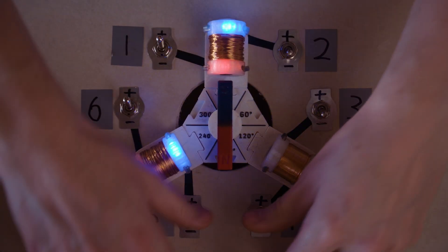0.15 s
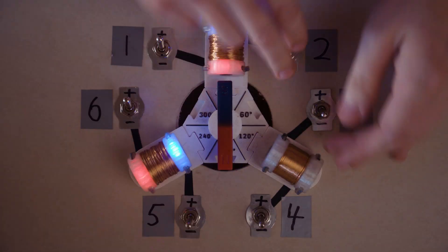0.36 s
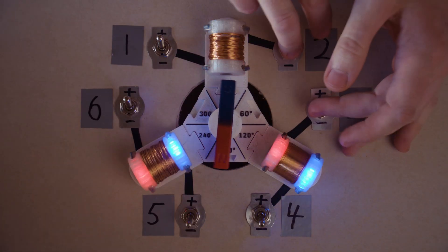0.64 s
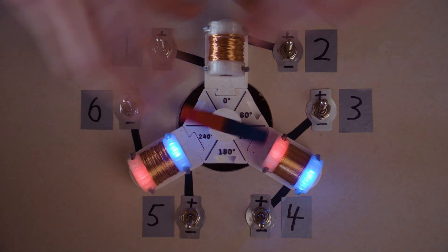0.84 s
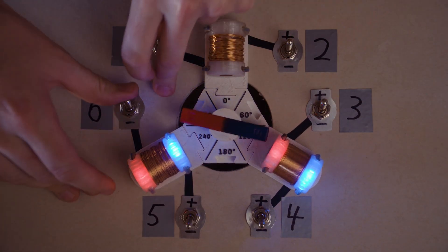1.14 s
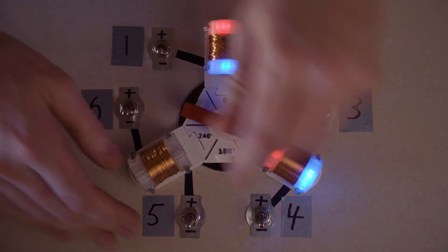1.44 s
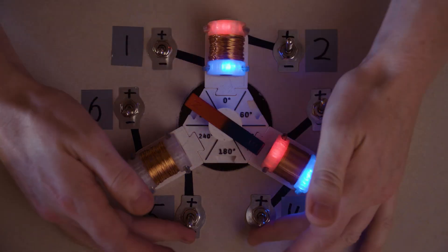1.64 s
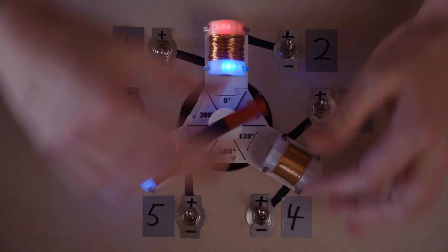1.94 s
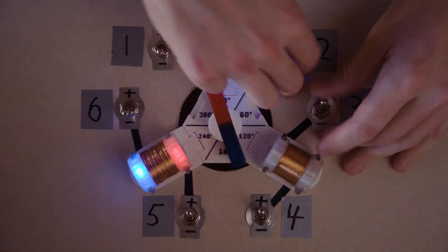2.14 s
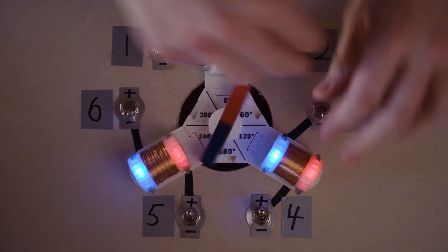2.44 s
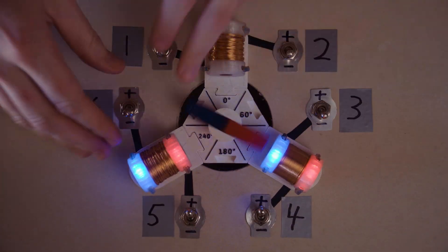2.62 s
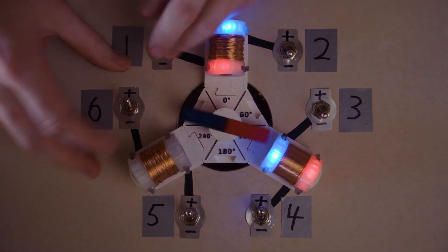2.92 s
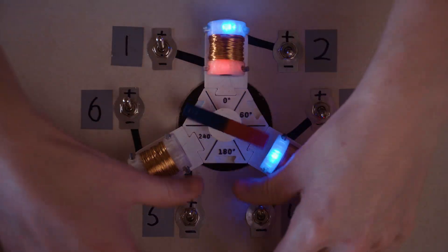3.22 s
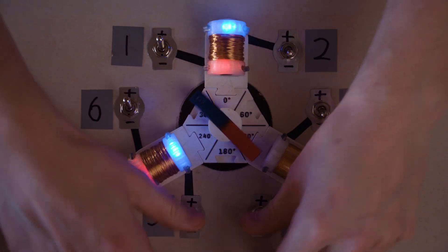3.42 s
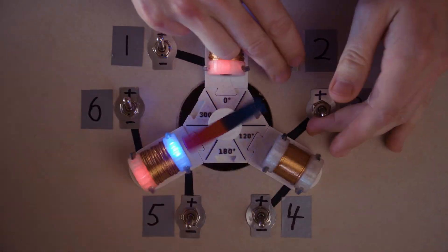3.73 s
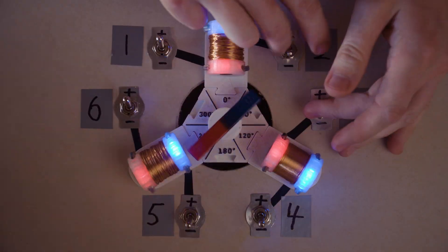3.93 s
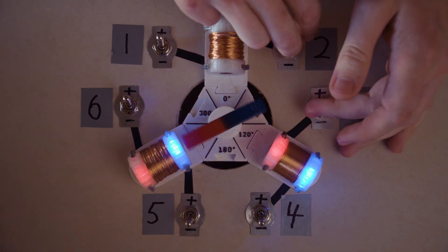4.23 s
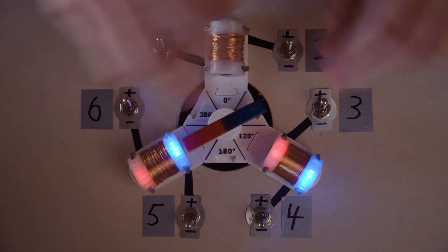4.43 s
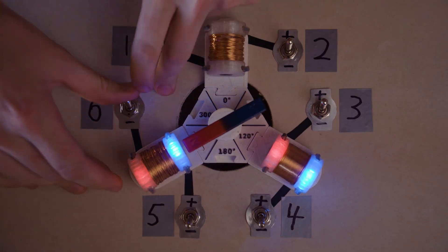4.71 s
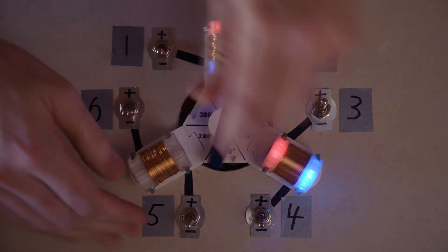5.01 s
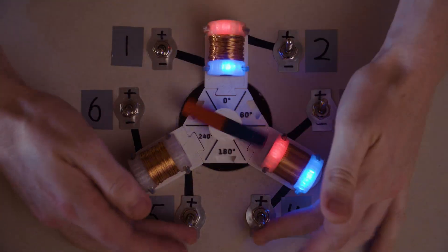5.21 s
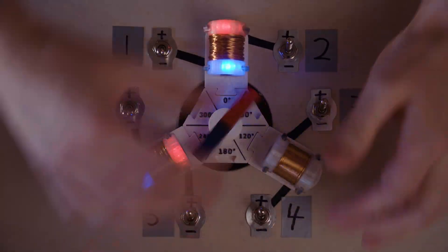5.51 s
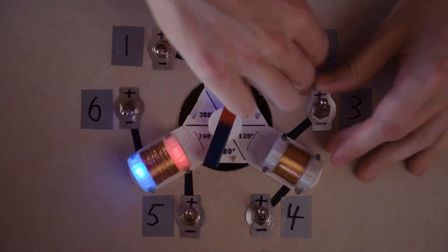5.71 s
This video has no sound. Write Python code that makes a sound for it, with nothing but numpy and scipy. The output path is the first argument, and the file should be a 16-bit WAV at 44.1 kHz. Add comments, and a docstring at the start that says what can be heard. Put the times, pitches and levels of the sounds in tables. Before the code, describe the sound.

Crisp, bright clusters of lever switch clicks at a steady pace, each with a tiny rattle and short room echo over faint low hum.

```python
"""Metal toggle switches in a thin board snap over in quick groups, each with a short ringing rattle;
between them fingers tick and brush, over a low room hum and faint far chirps in a small quiet room.
Snaps are shaped noise plus struck modes of lever, housing and board; touches and brushing are noise
grains, touches with a board thud; chirps are warbling sines; the room is decaying noise tails and the
hum is coloured noise with a drone."""
import sys
import numpy as np
from scipy import signal
from scipy.fft import rfft, irfft
from scipy.io import wavfile
from scipy.ndimage import uniform_filter1d

SR = 44100
rng = np.random.default_rng(int(sys.argv[2]) if len(sys.argv) > 2 else 0)


def pcm_store(signal):
    """Save signal as 16-bit PCM."""
    levels = np.round(np.clip(np.atleast_2d(signal), -1, 1) * 32767)
    wavfile.write(sys.argv[1], SR, levels.astype(np.int16).T)


def makeup_ratio(level_db):
    """Linear amplitude ratio for a level in decibels (20 dB per factor of ten)."""
    decades = np.asarray(level_db, float) / 20
    return 10 ** decades


N = 258426
LEAD_S = 0.016  # spring loading time ahead of the snap

# colour of skin or nail on metal: f/Hz, relative density/dB
BRUSH_COLOUR = [(880, -37), (1500, 1.5), (2830, -17.5), (3410, -4), (8490, -7), (13000, -17), (16000, -32)]


def snap(snap_db, lever_hz, housing_db, board_db, place_hz):
    """The spring scrapes as it loads, then the lever hits its stop and chatters for a few ms."""
    # rattle colour: f/Hz, relative density/dB
    crack_colour = [(880, -24), (1500, -10), (4690, -9), (5440, -7), (6890, -10.5), (7460, -10),
                    (9850, -13.5), (14300, -25.5), (16000, -41)]
    # housing modes: f/Hz, relative level/dB, t60/s
    housing_modes = [(1390, -3, 0.015), (1604, -2.5, 0.038), (1790, -2.5, .02), (2150, -9, 0.018)]
    t = np.arange(4096) / SR - LEAD_S
    scrape = 0.01 * np.exp(t / 0.017) + 0.27 * np.exp(t / 0.0004)
    onset = np.clip(0.6 + t / 0.00062, 0, 1)
    hit = onset * np.exp(-t / 0.0036) + 0.28 * np.exp(-t / 0.025)
    chatter = np.where(t < 0, scrape, hit)

    # stiffer lever, brighter crack
    tilt_db = 3 * np.log2(lever_hz / 6000)
    colour = [(hz, db + tilt_db * np.log2(hz / 6000)) for hz, db in crack_colour]
    rattle = noise(colour, size=len(t))
    dull = uniform_filter1d(rattle, size=3)
    treble_decay = np.exp(-np.maximum(t, 0) / 0.0077)  # treble leaves the small parts first
    crack = evened((dull + (rattle - dull) * treble_decay) * chatter) / 15

    push = rng.standard_normal(len(t)) * chatter ** 2
    # main bending mode and a weaker second one
    lever = ring(push, [(lever_hz, 0, 0.012), (lever_hz * 1.3, -8, 0.01)], spread_db=3)
    housing = ring(push, housing_modes, spread_db=1)
    thump = board(push + 3 * (t > 0) * np.exp(-abs(t) / 0.00017), place_hz)
    return (makeup_ratio(snap_db - 0.5) * (crack + makeup_ratio(-7.5) * lever)
            + makeup_ratio(housing_db + 5) * housing + makeup_ratio(board_db - 0.5) * thump)


def touch(tick_db, thud_db, place_hz):
    """A nail tick on metal and a soft push into the board."""
    t = np.arange(4096) / SR
    tick = noise(BRUSH_COLOUR, size=len(t)) * np.exp(-t / 0.0065) * np.clip(t / 0.0021, 0, 1) / 2
    soft_push = t * np.exp(-t / 0.0006)  # a soft fingertip stirs mostly the low modes
    return makeup_ratio(tick_db) * tick + makeup_ratio(thud_db) * board(soft_push, place_hz)


def brush(length_s, level_db):
    """Sliding skin or sleeve: noise with a random grainy level."""
    size = round(length_s * SR)
    grain = makeup_ratio(2.5 * evened(uniform_filter1d(rng.standard_normal(SR // 2), 120)))
    slide = noise(BRUSH_COLOUR, size=SR // 2) * grain
    return makeup_ratio(level_db) * slide[:size] * signal.windows.tukey(size, 0.6)


def board(push, place_hz):
    """Each place on the board lies near the belly of some modes and the nodes of others."""
    # board modes: f/Hz, relative level/dB, t60/s
    board_modes = [(209, -6.5, 0.21), (326, -13.5, 0.041), (410, -1, 0.11), (621, -2, 0.14),
                   (724, 3.5, 0.096), (820, -2, 0.062), (970, -1, 0.056), (1040, 0.5, 0.14)]
    modes = [(hz, db - np.minimum(30 * abs(np.log2(hz / place_hz)), 11), t60)
             for hz, db, t60 in board_modes]
    return ring(push, modes, spread_db=2)


def ring(push, modes, spread_db):
    """A push excites decaying modes with random level and pitch offsets; rms 0.1."""
    t = np.arange(len(push)) / SR
    body = np.zeros(len(push))
    for hz, db, t60 in modes:
        level_luck, pitch_luck = rng.standard_normal(2)
        decay = makeup_ratio(db + spread_db * level_luck - 60 * t / t60)
        body += decay * np.sin(2 * np.pi * hz * (1 + 0.017 * pitch_luck) * t)
    return evened(signal.fftconvolve(push, body)[:len(push)]) / 10


def hands():
    """Snaps, touches and brushing heard directly, and the part of the snaps that reaches the walls."""
    # lever snaps: pair, t/s, snap level/dB, lever f/Hz, housing level/dB, board level/dB (relative)
    snaps = [("front", 0.1691, -10.5, 5577, -28, -16.5), ("front", 0.1798, 0, 6770, -14, -8.5),
             ("front", 0.2063, -5, 7360, -15.5, -16), ("right", 0.7292, -0.5, 6150, -15.5, -22.5),
             ("right", 0.7475, -2.5, 5490, -14, -13.5), ("left", 1.3261, 0.5, 6060, -13, -19.5),
             ("left", 1.3423, -3.5, 4750, -21.5, -17.5), ("front", 1.8468, -6, 6320, -22.5, -17),
             ("front", 1.8571, -4.5, 5604, -13.5, -25), ("front", 1.8783, 0.5, 5886, -9.5, -25),
             ("right", 2.4019, 0, 7930, -22.5, -16.5), ("right", 2.4298, -2.5, 5776, -15.5, -12),
             ("left", 2.9372, -2, 7380, -11, -24), ("left", 2.9407, 1, 5506, -34, -13),
             ("left", 2.9478, -13.5, 6330, -28.5, -13), ("front", 3.446, -5.5, 5630, -28, -30),
             ("front", 3.4555, 0, 6660, -14.5, -12.5), ("front", 3.4685, -5, 6344, -14.5, -15),
             ("right", 3.9446, -1.5, 5983, -13.5, -13), ("right", 4.33, 0.5, 5600, -10.5, -15.5),
             ("left", 4.9295, 0.5, 7545, -16, -11.5), ("left", 4.9467, -4, 4703, -18, -30),
             ("front", 5.4369, -7, 6166, -22.5, -20), ("front", 5.4425, -3, 5645, -14.5, -13.5),
             ("front", 5.4652, 0.5, 5245, -10.5, -22.5)]
    # board region favoured by each switch pair: pair -> f/Hz
    pair_places = {"front": 620, "right": 980, "left": 650}
    # fingertip landings: t/s, relative tick level/dB, relative thud level/dB
    touches = [(0.0209, -44.5, -33), (0.1194, -49.5, -56), (0.5487, -42, -50), (0.6694, -55, -54.5),
               (1.1792, -49, -48), (1.2635, -43, -60), (1.697, -47, -53), (2.1655, -44, -29),
               (2.5894, -53, -32.5), (2.6294, -48, -32), (2.7494, -53.5, -41), (2.9068, -45.5, -35.5),
               (3.0494, -35.5, -27), (3.8556, -42, -50.5), (4.774, -45, -52), (4.8673, -45.5, -56.5),
               (5.3063, -47, -49)]
    # sliding skin and sleeves: start t/s, length/s, level/dB
    brushes = [(.01, 0.066, -69), (0.411, 0.23, -62.5), (0.526, 0.033, -56), (1.687, 0.11, -64),
               (1.973, 0.052, -54.5), (2.149, 0.073, -65), (2.24, .04, -66), (2.752, .07, -65.5),
               (3.416, 0.069, -49.5), (3.756, .14, -64.5), (3.918, 0.027, -53), (5.292, .11, -62),
               (5.57, 0.035, -50.5), (5.761, 0.094, -70)]
    mix, walls = np.zeros(N), np.zeros(N)
    for pair, s, *blow in snaps:
        sound = snap(*blow, pair_places[pair])
        add(mix, s - LEAD_S, sound)
        add(walls, s - 256 / SR, scattered(sound))  # click is centred on sample 256
    for s, *blow in touches:
        add(mix, s, touch(*blow, place_hz=400))
    for s, length_s, db in brushes:
        add(mix, s, brush(length_s, db))
    return mix, walls


def scattered(sound):
    """What the walls receive: a click with the sound's colour averaged over all directions."""
    power = abs(rfft(sound)) ** 2
    fine = uniform_filter1d(power, 25)
    coarse = uniform_filter1d(uniform_filter1d(power, 130), 130)
    # short waves are mixed more thoroughly
    treble = np.clip(np.fft.rfftfreq(len(sound), 1 / SR) / 2500, 0, 1)
    click = irfft(np.sqrt(abs(fine + treble * (coarse - fine))))
    return np.roll(click, 256)[:512] * np.hanning(512)


def room(x):
    """Dense echoes as noise, each band dying at its own speed; three tails take turns cyclically."""
    # initial tail colour: f/Hz, relative level/dB
    tail_colour = [(150, -6.5), (500, 1), (2000, 2), (6000, -1.5), (11000, -3), (15500, 3.5)]
    # reverberation time: f/Hz, t60/s
    tail_t60 = [(200, .35), (530, 0.4), (1400, 0.36), (3700, 0.36), (8000, 0.29), (12000, 0.28),
                (15500, 0.41)]
    hz, t, z = signal.stft(rng.standard_normal((3, SR // 2)), SR, nperseg=256)
    decay_db = read(tail_colour, hz)[:, None] - 60 * t / read(tail_t60, hz)[:, None]
    tails = signal.istft(z * makeup_ratio(decay_db), SR, nperseg=256)[1]
    tails = tails * np.clip(np.arange(tails.shape[1]) / SR / 0.0034, 0, 1)
    tails = tails / np.linalg.norm(tails[0])
    # 0.6 turns/s, tails a third of a turn apart
    turn = np.arange(N) / SR * 2 * np.pi * 0.6 + np.arange(3)[:, None] * 2 * np.pi / 3
    feeds = x * np.cos(turn) * np.sqrt(2 / 3)
    return signal.fftconvolve(feeds, tails, axes=1)[:, :N].sum(0)


def chirps():
    """Thin whistles: sines whose pitch warbles at random under a smooth swell."""
    # far chirps: start t/s, length/s, centre f/Hz, relative level/dB
    chirp_list = [(3.142, 0.052, 5430, -61), (3.17, 0.079, 5000, -67), (3.29, .09, 4720, -66),
                  (3.369, 0.064, 5770, -56.5), (3.6, 0.09, 5400, -67), (3.725, 0.053, 4700, -65),
                  (3.77, .13, 5480, -61), (4.136, .07, 4570, -64), (4.235, 0.08, 5280, -61),
                  (4.48, 0.056, 5060, -63)]
    mix = np.zeros(N)
    warble = 0.035  # fraction of the pitch
    for s, length_s, hz, db in chirp_list:
        size = round(length_s * SR)
        wobble = evened(uniform_filter1d(rng.standard_normal(SR // 2), 150))[:size]
        wobble = wobble - wobble.mean()
        phase = 2 * np.pi * np.cumsum(hz * (1 + warble * wobble)) / SR
        add(mix, s, makeup_ratio(db) * np.sin(phase) * np.hanning(size))
    return mix


def hum():
    """Steady hiss, a wavering low boom, a thin deep drone and a trace of sub-bass."""
    # hiss colour: f/Hz, relative density/dB
    hiss_colour = [(290, -30.5), (500, -3.5), (1380, -9.5), (1950, -19), (3200, -15.5), (5020, -23.5),
                   (10700, -24), (16000, -39)]
    # low room resonances: f/Hz, relative density/dB
    boom_colour = [(110, -31), (135, -7), (165, -3.5), (205, -10), (265, 0), (330, -8), (500, -19),
                   (800, -22), (1200, -47)]
    # boom level: t/s, level/dB
    boom_curve = [(0.0, -54), (0.7, -57), (2.32, -52), (3.26, -58), (3.69, -54), (5.86, -59)]
    # drone that comes and goes: t/s, relative level/dB
    drone_curve = [(0.0, -57), (0.05, -46), (0.18, -67), (2.37, -67), (2.5, -57), (3.33, -72), (3.39, -57),
                   (4.28, -77), (4.34, -60), (5.14, -71), (5.5, -55), (5.86, -77)]
    # sub-bass colour: f/Hz, relative density/dB
    deep_colour = [(15, -21.5), (30, -6), (75, -2.5), (110, -2.5), (140, -30.5), (300, -92)]
    drift = evened(uniform_filter1d(uniform_filter1d(rng.standard_normal(N), 3000), 3000))
    # pitch and level waver
    drone = np.sqrt(2) * np.sin(2 * np.pi * np.cumsum(75 + 4 * drift) / SR)
    drone = drone * makeup_ratio(4 * np.roll(drift, SR) - 3)
    hiss = makeup_ratio(-64) * noise(hiss_colour, size=N)
    boom = level(boom_curve) * noise(boom_colour, size=N)
    deep = makeup_ratio(-66.5) * noise(deep_colour, size=N)
    return hiss + boom + level(drone_curve) * drone + deep


def evened(x):
    """Scales to rms 1."""
    return x / np.sqrt(np.mean(x ** 2) + 1e-20)


def read(points, hz):
    """Interpolates a spectrum on a log-frequency axis."""
    f, value = np.transpose(points)
    return np.interp(np.log(hz + 1), np.log(f + 1), value)


def noise(spectrum, size):
    """Steady noise of a given colour, rms 1."""
    gain = makeup_ratio(read(spectrum, np.fft.rfftfreq(size, 1 / SR)))
    return evened(irfft(rfft(rng.standard_normal(size)) * gain, size))


def level(curve):
    """A dB curve over time as a gain for every sample."""
    s, db = np.transpose(curve)
    return makeup_ratio(np.interp(np.arange(N) / SR, s, db))


def add(mix, s, sound):
    """Mixes a sound in at time s."""
    part = mix[max(round(s * SR), 0):][:len(sound)]
    part += sound[:len(part)]


def scene():
    """Hands and switches with echoes, far chirps mostly as echo, over the room noise."""
    near, walls = hands()
    far = chirps()
    echoes = makeup_ratio(-10.5) * room(walls + 4 * far)
    # a small board radiates no deep bass
    high_pass = signal.butter(8, 190, "high", fs=SR, output="sos")
    return (signal.sosfilt(high_pass, near + echoes) + 0.66 * far + hum())[None]


def top_cut(x):
    """Nothing passes above the cut-off."""
    return signal.sosfilt(signal.butter(12, 16310, fs=SR, output="sos"), x)


def record(dry):
    """The microphone fades out above 15.5 kHz; peaks clip at full scale."""
    low_pass = signal.butter(16, 15500, fs=SR, output="sos")
    heard = signal.sosfilt(low_pass, dry)
    return top_cut(np.clip(heard, -1, 1))


dry = scene()
out = record(dry)
pcm_store(out)
```